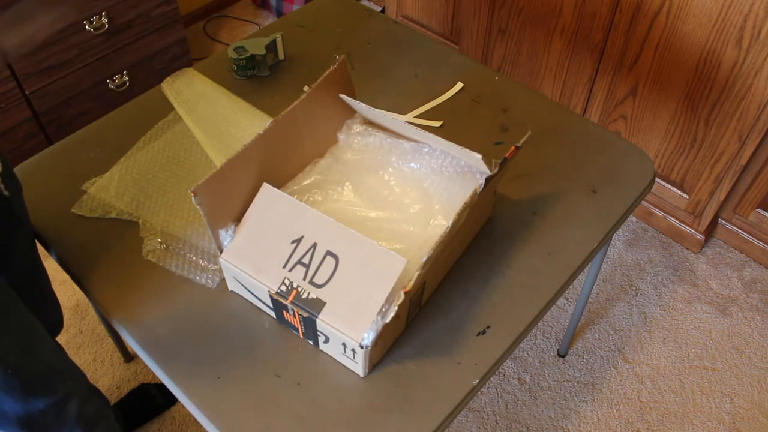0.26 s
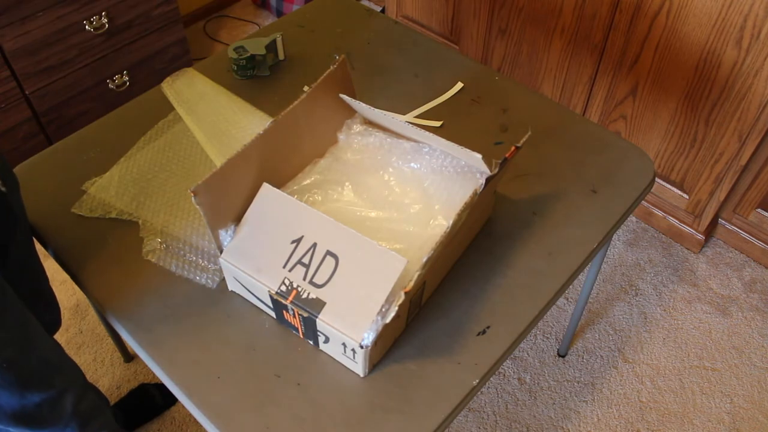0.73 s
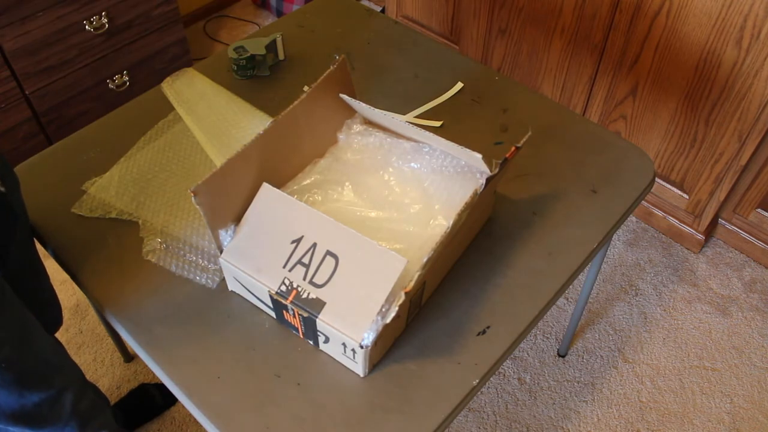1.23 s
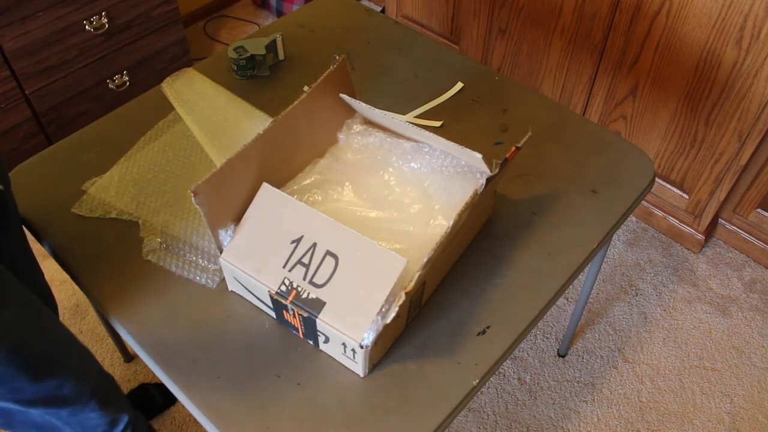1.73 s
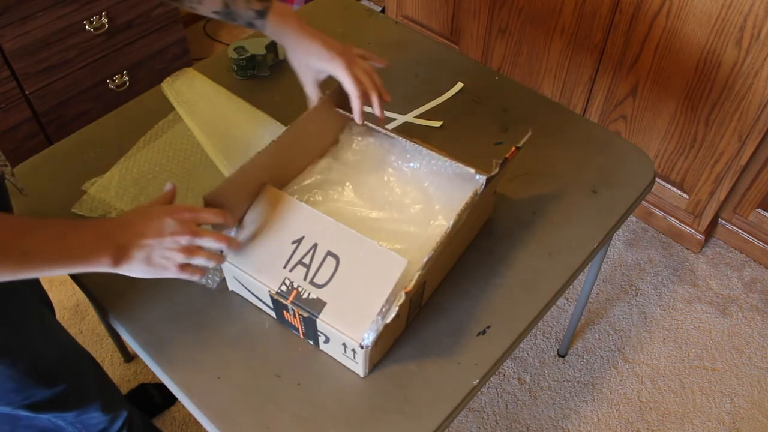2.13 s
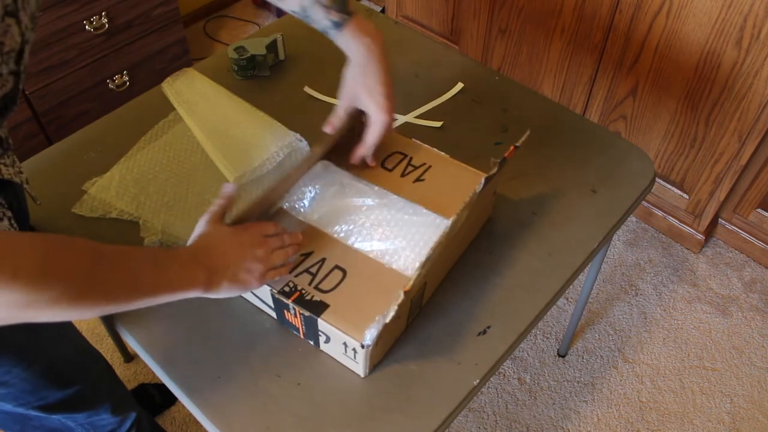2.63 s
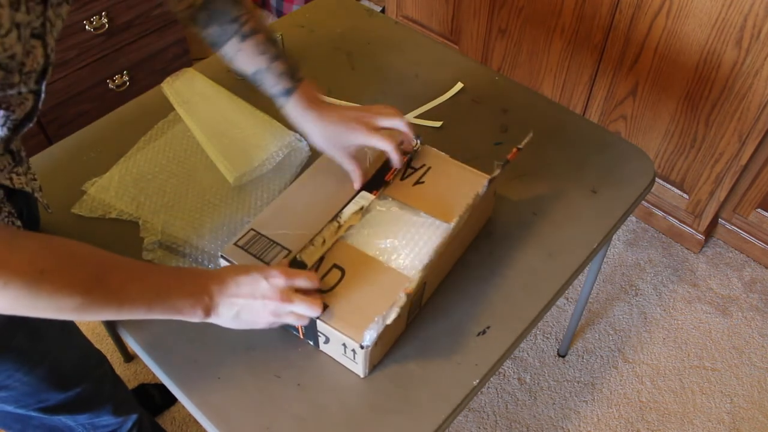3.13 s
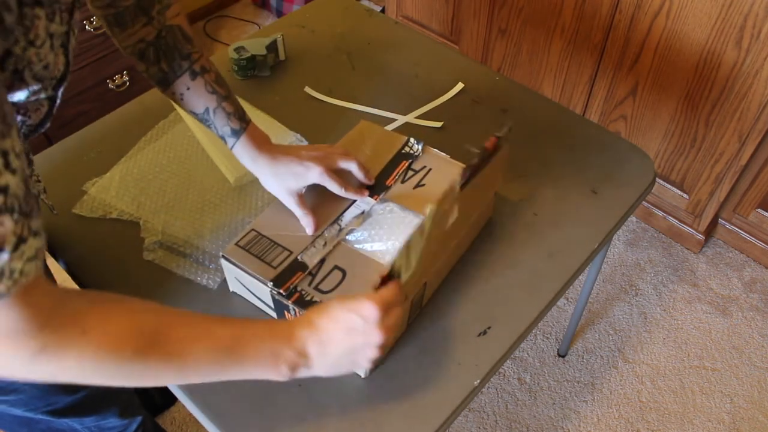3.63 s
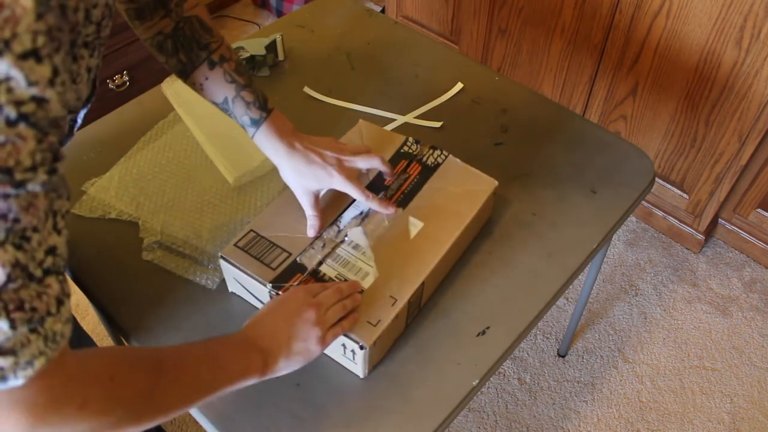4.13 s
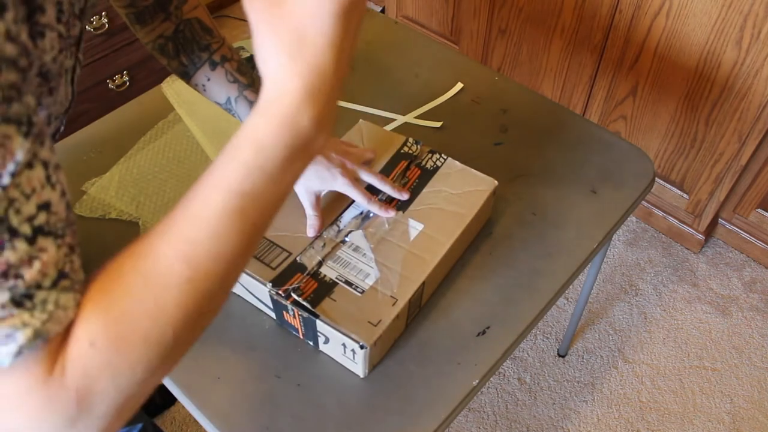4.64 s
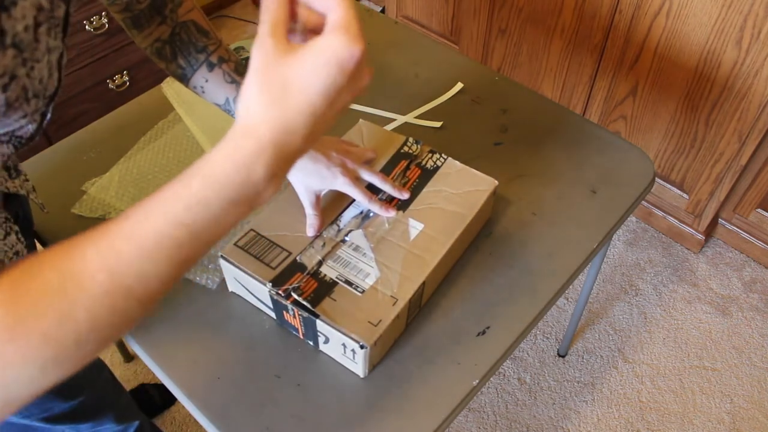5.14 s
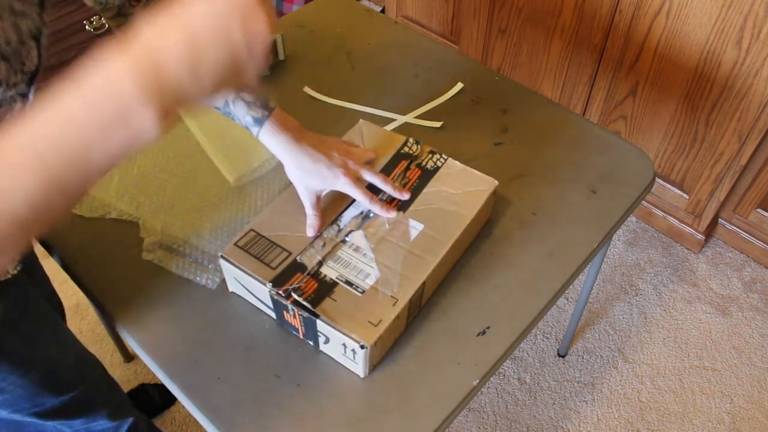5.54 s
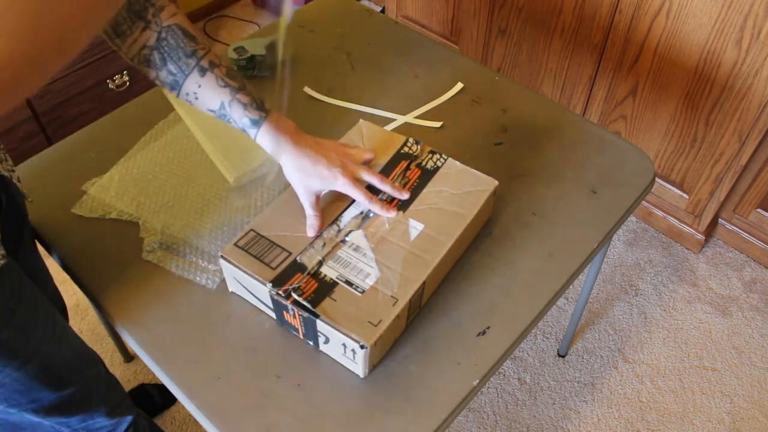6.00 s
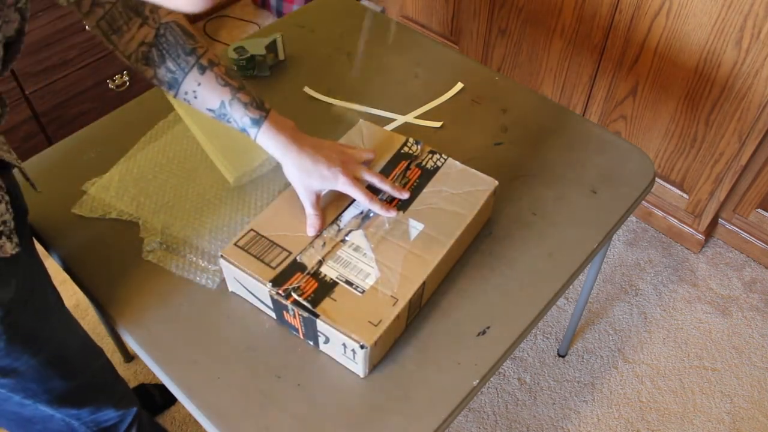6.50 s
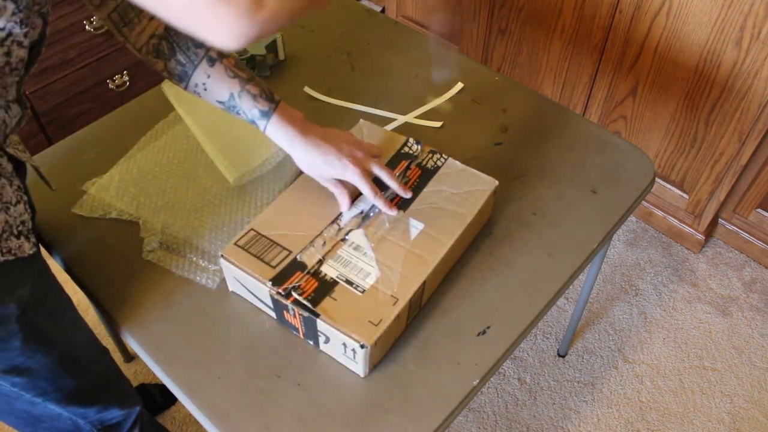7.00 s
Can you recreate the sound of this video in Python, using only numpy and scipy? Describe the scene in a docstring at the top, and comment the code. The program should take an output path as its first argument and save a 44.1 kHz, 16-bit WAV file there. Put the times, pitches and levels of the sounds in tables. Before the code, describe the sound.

Sparse sharp crackles of stiff plastic film, then hands scraping and thumping hollow cardboard flaps shut, followed by short crinkly snaps of tape in a small room.

```python
"""Packing tape is peeled and handled in short crackling pulls: glue letting go gives dense crinkle, and film
and flap edges snap free as filtered clicks. A fingernail ticks on the hollow plastic dispenser. Hands fold
the flaps of a cardboard box: noise and grit scrape, while resonances of the box boom and knock.
A small carpeted room adds echoes, hiss and a faint wavering hum; one microphone feeds both channels."""
import sys
import numpy as np
from scipy import signal
from scipy.fft import rfft, irfft
from scipy.io import wavfile
from scipy.ndimage import uniform_filter1d

SR = 44100
rng = np.random.default_rng(int(sys.argv[2]) if len(sys.argv) > 2 else 0)


def dump(signal):
    """Clip the signal to [-1, 1] and save it as 16-bit WAV at the path in sys.argv[1]."""
    limited = np.clip(np.atleast_2d(signal).T, -1, 1)
    pcm = np.round(limited * 32767).astype(np.int16)
    wavfile.write(sys.argv[1], SR, pcm)


N = 320166  # samples

# Steady room air and microphone hiss: pitch_hz, relative_db
AIR_SPECTRUM = [(15, -47), (25, -5), (70, -5.5), (210, -4), (434, -4.5), (829, -8.5), (1760, -10),
                (3950, -14), (8630, -19), (15600, -28.5)]
# Decay of the room tail: pitch_hz, t60_s
ROOM_DECAY = [(200, 0.33), (700, 0.27), (9700, 0.27)]
# Colour of the room tail: pitch_hz, level_db
TAIL_COLOUR = [(100, -11), (400, -4), (2000, -8), (5000, -10), (10000, -11), (16000, -27)]
# First echoes off the walls: delay_s, level_db
FIRST_ECHOES = [(.006, -14), (0.013, -20)]
# Modes of the box and the table under it: pitch_hz, level_db, t60_s (when knocked)
BOX_MODES = [(71, -10, 0.16), (106, -3.5, 0.12), (160.5, 1, 0.11), (200.4, 2.5, 0.13), (278, 2, 0.12),
             (360.6, 6.5, 0.039), (426, 7.5, 0.042), (553, -1, 0.06), (701, -1, 0.044), (810, 1.5, 0.036),
             (940, 0, 0.034), (1210, -1.5, 0.011)]
# Blows on the box: start_s, peak_db, favoured_hz (of the struck panel)
KNOCKS = [(2.175, -32, 334), (2.191, -33.5, 80), (2.225, -32, 480), (2.305, -24, 139), (2.584, -23.5, 504),
          (3.097, -41.5, 199), (3.127, -20.5, 433), (3.158, -28, 404), (3.225, -22, 337), (3.326, -26, 685),
          (3.36, -28, 355), (3.664, -36, 570), (4.168, -36, 183), (4.288, -30, 350), (5.058, -41.5, 370),
          (6.65, -42, 730), (6.69, -32.5, 200), (6.7299, -33.5, 199), (6.7385, -35.5, 460),
          (7.126, -35, 500), (7.1382, -26, 186), (7.192, -48, 203), (7.254, -36, 326)]
# Fingernail taps on the dispenser: start_s, level_db
TICKS = [(0.6523, -32.5), (.678, -34.5)]
# Modes of the hollow plastic dispenser: pitch_hz, relative_db, t60_s
DISPENSER_MODES = [(1390, 0, .03), (3330, -11, .012), (5800, -9, .008)]
# Strokes of the hands on the flaps: full_s (moment of full level), rise_s, hold_s, fall_s (20 dB each way),
# scrape_db, treble_db (relative to scrape), boom_db, panel_hz (favoured by the pressed panel)
HAND_STROKES = [(2.088, 0.022, 0.084, .1, -51, -2.5, -48, 300),
                (2.183, 0.046, 0.093, 0.13, -41.5, -11.5, -30, 430),
                (2.319, 0.023, 0.018, 0.11, -33.5, 1.5, -28, 375),
                (2.548, 0.16, 0.018, 0.18, -40, 0, -32.5, 442),
                (2.781, 0.16, 0.11, 0.67, -46.5, -2, -42.5, 370),
                (2.89, 0.12, 0.083, 0.15, -77, -2, -33.5, 736),
                (3.068, 0.052, 0.027, 0.15, -43.5, -4.5, -36.5, 600),
                (3.144, 0.017, 0.042, 0.067, -51, 1.5, -31, 422),
                (3.256, 0.026, 0.075, 0.15, -42, -5.5, -30.5, 505),
                (3.507, 0.28, 0.028, 0.13, -56.5, 2, -60, 300),
                (3.662, 0.015, 0.012, 0.073, -41, -26, -39.5, 343),
                (3.827, 0.16, 0.065, 0.12, -48.5, 0, -46, 252),
                (4.065, 0.24, 0.011, 0.1, -48.5, -3.5, -42, 238),
                (4.198, 0.12, 0.071, 0.12, -47, -8.5, -37.5, 304),
                (4.295, 0.024, 0.034, 0.05, -53.5, 1.5, -38.5, 397),
                (6.733, 0.023, 0.01, 0.046, -55, -5, -38, 500),
                (7.019, 0.29, 0.061, 0.058, -49, -16, -45.5, 850),
                (7.134, 0.0083, 0.0071, 0.07, -45.5, -14, -29.5, 790),
                (7.258, 0.0091, .005, 0.058, -45.5, -22, -47, 350)]
# Tone of scraped cardboard: pitch_hz, relative_db
CARD_SPECTRUM = [(290, -41), (500, 12.5), (876, 8), (1820, 7), (3060, 5), (6090, 1), (15500, -12.5)]
# Film and flap edges snapping free: start_s, energy_db, peak_hz (strongest pitch),
# below_db (fall below that pitch, dB an octave), length_ms (decay constant of the grit, held to 0.1-9 ms)
SNAPS = [(0.1596, -20.5, 4100, 0.5, 7.7), (0.2032, -3.5, 5470, 7, 1.1), (0.21, -22, 6940, 7, 1.1),
         (0.2183, -13, 10400, 10, 0.7), (0.2218, -18, 5300, 16, 0.6), (0.3193, -4.5, 5650, 4, 1.9),
         (0.571, -29, 6500, 14, 0.6), (0.6172, -20.5, 4150, 1, 0.57), (0.7472, -17, 5830, -1.5, 1.4),
         (1.222, -28, 3000, 1, 2), (1.373, -16, 9500, 18, 1.1), (1.378, -12, 8000, 1, .7),
         (1.385, -14, 4000, 6.5, 1.7), (1.3985, -21, 8000, 3, 0.63), (1.4077, -10, 6000, 2, 0.27),
         (1.415, -20, 7000, 7, 0.64), (1.4294, -19, 11000, 8, .5), (1.4695, -4.5, 2980, 6, 0.88),
         (1.4729, 3, 4300, 2, 0.44), (1.5151, 3, 3540, -1.5, 3.2), (1.5245, -2, 7200, 0, 1),
         (1.532, 2, 3510, 19, 1.1), (1.948, -23.5, 1530, 15, 11), (2.0334, -12.5, 2760, 11, 3.5),
         (2.178, -6.5, 1870, 1.5, 13), (2.306, -7, 9300, 8, 8), (2.3809, 1, 3200, -3.5, 15),
         (2.789, -17, 4970, 8, .6), (3.2218, -14, 6050, 6, 3.5), (3.264, -11, 2190, 16, 8.9),
         (3.6628, -17, 8450, 3, 9.8), (4.063, -16, 8200, 1, 1.2), (4.57, -28, 2940, 14, 2.3),
         (4.668, -23.5, 4120, 4, 7), (4.812, -16, 4960, 4.5, 1.8), (4.866, -15.5, 4760, 22, 2.3),
         (4.9024, -14.5, 900, 0.5, 2.2), (4.959, -18, 4800, 8, 3), (4.9838, -14, 6200, -3.5, 5.4),
         (5.028, -17, 2380, 9, 4.8), (5.0646, -17, 1500, 3.5, 0.44), (5.158, -25, 4890, 5, 1.3),
         (5.195, -22, 8400, 2, .8), (5.2005, -28, 10500, -2, .6), (5.206, -27, 12500, -2, 1.1),
         (5.2185, -6.5, 7550, 1, 0.49), (5.2241, -8.5, 4890, 2.5, 1.3), (5.288, -16, 3440, 2, 1.4),
         (5.357, -9, 7360, 3, 1.1), (5.364, -1, 3360, 5, 0.88), (5.3688, -3, 5400, 11, 0.53),
         (5.5758, -8, 6960, 3, 2.2), (5.645, -16, 3180, 6, 4.1), (5.6975, -21.5, 2480, 13, 1.9),
         (5.794, -9, 3940, 6.5, 2), (5.824, -22, 4230, 23, 2.5), (5.941, -27, 1970, 11, 5.4),
         (6.0176, -23.5, 2060, 0.5, 2.9), (6.513, -21, 10900, 21, 1.8), (7.137, -21, 4760, 32, 2.2)]
# Bursts of dense film crinkle: full_s (moment of full level), rise_s, hold_s, fall_s (20 dB each way; the
# fizz has its own fall), level_db, fizz_db and low_db (both relative to level_db)
TAPE_PULLS = [(0, .01, 0.091, 0.93, -59, -19, -15), (0.208, 0.0067, .003, 0.14, -50.5, 12, -2),
              (0.321, 0.067, 0.0064, 0.1, -43, 1, -1), (1.369, 0.012, 0.071, .1, -52, 7.5, -3),
              (1.472, 0.068, 0.024, 0.081, -43.5, 4.5, -1.5), (1.514, .006, 0.012, 0.1, -34.5, -4.5, -9),
              (1.895, 1, 0.14, .05, -61.5, -28, 1.5), (4.588, 0.22, 0.14, 0.091, -64, 0, -7),
              (4.845, 0.08, 0.046, 0.095, -48.5, -15, -8.5), (4.957, .004, 0.008, 0.021, -47.5, -3, -12),
              (4.982, .004, 0.013, 0.12, -49, 6, -3.5), (5.062, .004, 0.01, 0.11, -49.5, -7, -8),
              (5.2, 0.1, 0.017, .2, -49.5, -10, -14), (5.354, 0.1, 0.009, 0.077, -41.5, -2, -7),
              (5.575, 0.0029, 0.0079, 0.11, -48.5, 7.5, -6), (5.64, .04, 0.09, 0.22, -59.5, -24, -5.5),
              (5.791, .01, 0.012, 0.17, -47.5, -1, -21)]
# Tone of crinkling film: pitch_hz, relative_db
FILM_SPECTRUM = [(120, -52), (200, 1), (497, 9), (1090, 6.5), (1780, 2), (3200, 4), (5000, -0.5),
                 (10600, -11), (15500, -19)]

AIR_DB = -56
HUM_HZ, HUM_DB, HUM_WAVER_DB = 121, -67, 1
PANEL_DB = -6  # an octave away from the favoured pitch, while a panel is pressed
FADE_DB = -20  # change over one rise or fall time
FIZZ_FALL_S = 0.022  # the fizz dies in its own time, whatever the body of the crinkle does
ABOVE_DB, ABOVE_DB_PER_KHZ = 3.5, 2.5  # snap's fall above its pitch, an octave: steeper for higher snaps
NARROW = 0.58  # snaps that fall steeply below their pitch fall more steeply above it too
RING, RING_OCTAVES = 0.31, 0.051  # steep snaps also ring: dB of peak per dB of fall, half width
EDGE_HZ = 15800  # top of the band: nothing is heard above this pitch


def gain_of(db):
    """Amplitude factor for a level in dB."""
    return 10 ** (np.asarray(db) / 20)


def evened(x):
    """Scales x to rms 1."""
    return x / np.sqrt(np.mean(x ** 2) + 1e-20)


def read(points, hz):
    """Reads a table between its points, along log frequency."""
    f, value = np.transpose(points)
    return np.interp(np.log(hz + 1), np.log(f + 1), value)


def add(mix, s, sound):
    """Lays a sound into the mix from s seconds on."""
    part = mix[round(s * SR):][:len(sound)]
    part += sound[:len(part)]


def coloured(x, points):
    """Multiplies the spectrum of x by a table of dB, then evens it."""
    gain = gain_of(read(points, np.fft.rfftfreq(len(x), 1 / SR)))
    return evened(irfft(rfft(x) * gain, len(x)))


def halves(x, hz):
    """The parts of x below and above hz, each brought to rms 1."""
    split = signal.butter(1, np.clip(hz, 20, 20000), fs=SR, output="sos")
    low = signal.sosfiltfilt(split, x)
    return evened(low), evened(x - low)


def uneven(count, spread_db, size):
    """A gain that wanders at random over about size samples."""
    return gain_of(spread_db * evened(uniform_filter1d(rng.standard_normal(count), size)))


def swells(full_s, rise_s, hold_s, fall_s, level_db):
    """Rise, hold and fall of each gesture, straight in dB, summed as power."""
    t = np.arange(0, N + 32, 32)[:, None] / SR
    before = (full_s - t) / np.maximum(rise_s, .002)
    after = (t - full_s - hold_s) / np.maximum(fall_s, .002)
    under = np.clip(np.maximum(before, after), 0, 9)
    power = (gain_of(level_db + FADE_DB * under) ** 2).sum(axis=1)
    return np.interp(np.arange(N) / SR, t[:, 0], np.sqrt(power))


def ring(x, hz, width_hz):
    """A two-pole resonance."""
    r = np.exp(-np.pi * width_hz / SR)
    return signal.lfilter([1, -1], [1, -2 * r * np.cos(2 * np.pi * hz / SR), r * r], x)


def crackle(count, per_s, spread_db):
    """Clicks at random moments, most small and a few large."""
    size = gain_of(spread_db * np.minimum(rng.exponential(1, count), 4))
    size = size * rng.choice([-1., 1.], count)
    return size * np.clip((per_s / SR - rng.random(count)) * SR / 50, 0, 1)


def patches(clicks, low_hz, high_hz, q, count):
    """Each click rings one of several small patches, each with its own pitch."""
    which, pitches = rng.integers(0, count, N), np.geomspace(low_hz, high_hz, count)
    return evened(sum(evened(ring(clicks * (which == k), hz, hz / q)) * np.sqrt(hz)
                      for k, hz in enumerate(pitches)))


def background():
    """Room air and microphone hiss, with a wavering low hum."""
    air = coloured(rng.standard_normal(N), AIR_SPECTRUM) * uneven(N, 1.0, size=6000)
    tone = np.sin(2 * np.pi * HUM_HZ * np.arange(N) / SR)
    hum = evened(tone * uneven(N, HUM_WAVER_DB, size=3000))
    return gain_of(AIR_DB) * air + gain_of(HUM_DB) * hum


def room(x):
    """A few first echoes, then sparse taps whose bands die at their own speeds."""
    taps = np.zeros(SR)
    at = np.arange(400, SR - 20, 20) + rng.integers(0, 20, (SR - 401) // 20)
    taps[at] = rng.choice([-1., 1.], at.shape)
    hz, t, bands = signal.stft(taps, SR, nperseg=256)
    decay = gain_of(-60 * t / np.maximum(read(ROOM_DECAY, hz), .05)[:, None])
    tail = signal.istft(bands * decay, SR, nperseg=256)[1]
    bands = signal.stft(tail / np.linalg.norm(tail), nperseg=256)[2]
    tail = signal.istft(bands * gain_of(read(TAIL_COLOUR, hz))[:, None], nperseg=256)[1]
    for s, db in FIRST_ECHOES:
        add(tail, s, gain_of([db]))
    return x + signal.fftconvolve(x, tail)[:N]


def knock(peak_db, favoured_hz):
    """A soft blow rings the modes of the box, those near the struck panel's pitch most."""
    t = np.arange(SR // 5) / SR
    modes = np.zeros(len(t))
    for k, (hz, db, t60) in enumerate(BOX_MODES):
        level_db = db - 10 * abs(np.log2(hz / favoured_hz)) - 60 * t / t60
        modes += gain_of(level_db) * np.sin(2 * np.pi * hz * t) * (-1) ** k
    modes = modes * (1 - np.exp(-t / 0.002))  # soft onset
    return gain_of(peak_db) * modes / abs(modes).max()


def tick(level_db):
    """A short hard tap rings the dispenser."""
    t = np.arange(SR // 10) / SR
    modes = sum(gain_of(db - 60 * t / t60) * np.sin(2 * np.pi * hz * t) for hz, db, t60 in DISPENSER_MODES)
    return gain_of(level_db) * modes


def handle():
    """Flaps scrape past each other in uneven slips, and the hollow box booms along."""
    *shape, scrape_db, treble_db, boom_db, panel_hz = np.transpose(HAND_STROKES)
    slips = uneven(N, 1.16, size=300)
    grit = patches(crackle(N, 1500, 3.5), 1000, 12000, 6, count=12)
    fibres = slips * (rng.standard_normal(N) + 0.5 * grit)
    card, treble = halves(coloured(fibres, CARD_SPECTRUM), 4600)
    scrape = swells(*shape, scrape_db) * card + swells(*shape, scrape_db + treble_db) * treble

    shoves = evened(crackle(N, 120, 3.0)) + .6 * rng.standard_normal(N)
    shoves = shoves * uneven(N, 1.56, size=700)
    # each stroke shares its boom among the modes, by distance from the pressed panel's pitch
    share = gain_of([db + PANEL_DB * abs(np.log2(hz / panel_hz)) for hz, db, _ in BOX_MODES])
    share_db = 20 * np.log10(share / np.linalg.norm(share, axis=0))
    boom = np.zeros(N)
    for k, (hz, _, t60) in enumerate(BOX_MODES):
        mode = evened(ring(shoves, hz, 5.0 / t60))  # broader than the freely ringing mode
        boom += swells(*shape, boom_db + share_db[k]) * (-1) ** k * mode
    return scrape + boom


def snap(energy_db, peak_hz, below_db, length_ms, hiss):
    """A sharp jolt and a trail of grit, coloured by the patch that let go."""
    ms = np.arange(len(hiss)) / SR * 1000
    jolt = (ms == 0) + .5 * hiss * np.exp(-ms / np.clip(length_ms, .1, 9))
    hz = np.maximum(abs(np.fft.fftfreq(len(ms), 1 / SR)), 30)
    octaves = np.log2(hz / peak_hz)
    above_db = ABOVE_DB + ABOVE_DB_PER_KHZ * peak_hz / 1000 + NARROW * below_db
    slope_db = np.where(octaves < 0, below_db, -above_db) * octaves
    small_db = 10 * np.minimum(np.log2(hz / 350), 0)  # a small patch sends out little bass
    ring_db = RING * max(below_db, 0) / (1 + (octaves / RING_OCTAVES) ** 2)
    log_gain = np.log(gain_of(slope_db + small_db + ring_db))
    colour = np.exp(np.conj(signal.hilbert(log_gain)))  # causal: nothing sounds before the jolt
    click = np.fft.ifft(np.fft.fft(jolt) * colour).real
    return gain_of(energy_db) * click / np.linalg.norm(click)


def pull():
    """Glue threads let go in clumps; the larger ones flick a patch of film that rings briefly."""
    *shape, fall_s, level_db, fizz_db, low_db = np.transpose(TAPE_PULLS)
    clumps, flicks = uneven(N, 2.3, size=250), crackle(N, 1300, 3.2)
    hiss = clumps * rng.standard_normal(N)
    flicked = patches(clumps * flicks, 1635, 7700, 6.8, count=12)
    low, body = halves(coloured(flicked + 1.34 * hiss, FILM_SPECTRUM), 1300)
    # the fizz takes the bare clicks, without the ringing patches
    fizz = halves(coloured(evened(clumps * flicks) + 0.73 * hiss, FILM_SPECTRUM), 5100)[1]
    crinkle = swells(*shape, fall_s, level_db) * body
    rustle = swells(*shape, fall_s, level_db + low_db) * low
    return crinkle + rustle + swells(*shape, FIZZ_FALL_S, level_db + fizz_db) * fizz


def scene():
    """Mixes the gestures close by, sets them in the room and lays the background under them."""
    near = pull() + handle()
    grit = rng.standard_normal((len(SNAPS), 2048))
    for (s, *row), hiss in zip(SNAPS, grit):
        add(near, s, snap(*row, hiss))
    for s, db in TICKS:
        add(near, s, tick(db))
    for s, *row in KNOCKS:
        add(near, s, knock(*row))
    return np.tile(room(near) + background(), (2, 1))


def record(dry):
    """The microphone loses the deep bass; then a steep cut of the highest treble."""
    thin = signal.sosfilt(signal.butter(2, 60, "highpass", fs=SR, output="sos"), dry)
    treble_cut = signal.firwin(511, EDGE_HZ, window=("kaiser", 9), fs=SR)
    return signal.oaconvolve(thin, treble_cut[None], "same")


dry = scene()
out = record(dry)
dump(out)
```